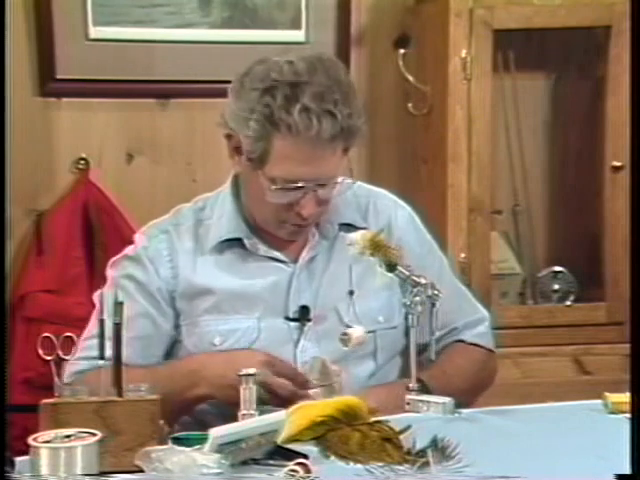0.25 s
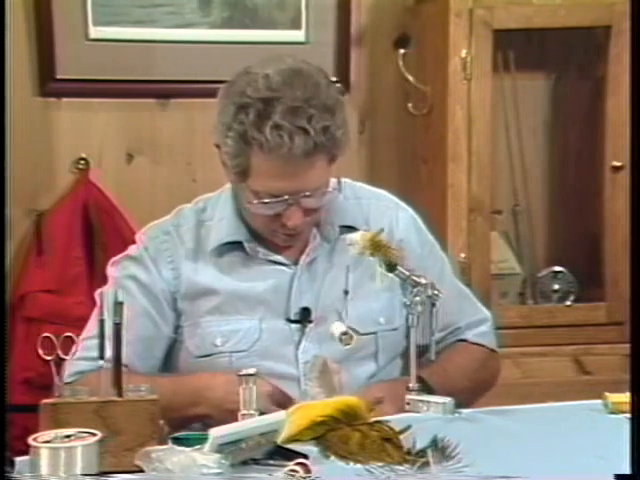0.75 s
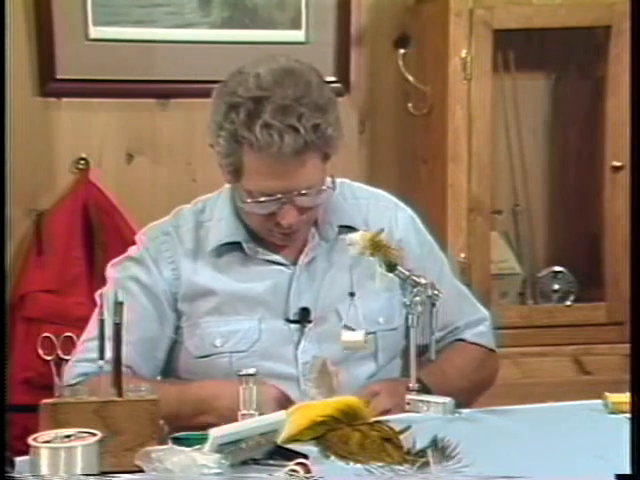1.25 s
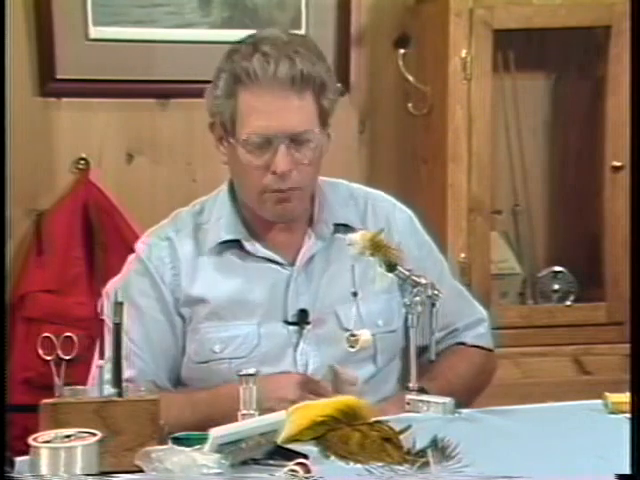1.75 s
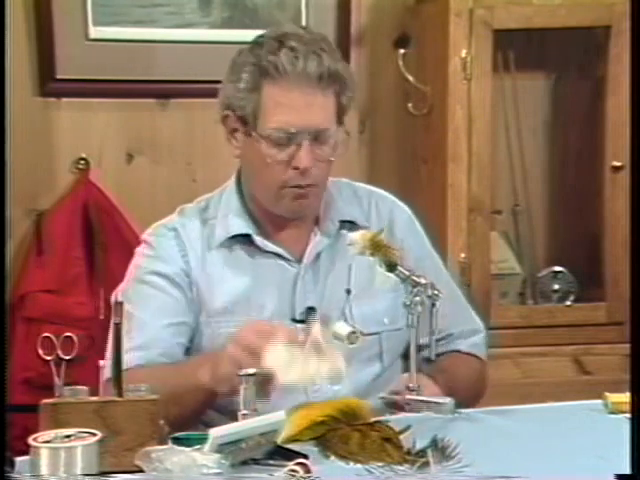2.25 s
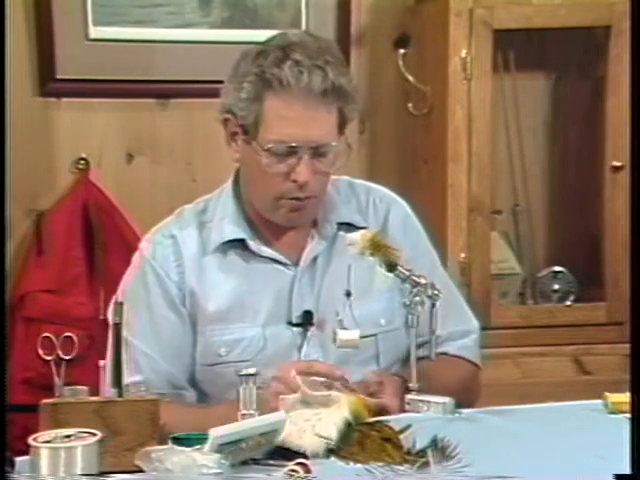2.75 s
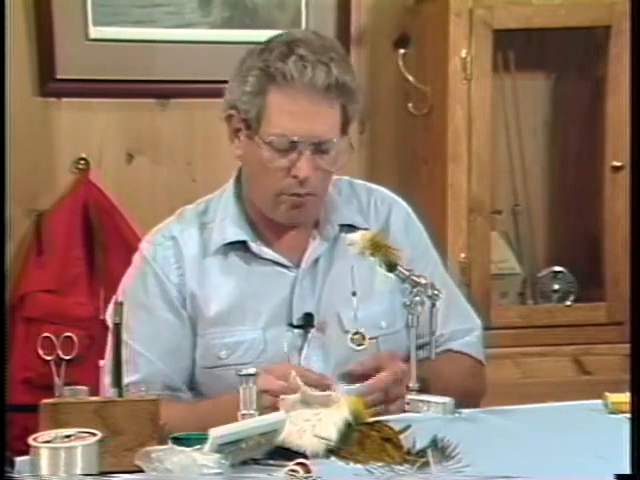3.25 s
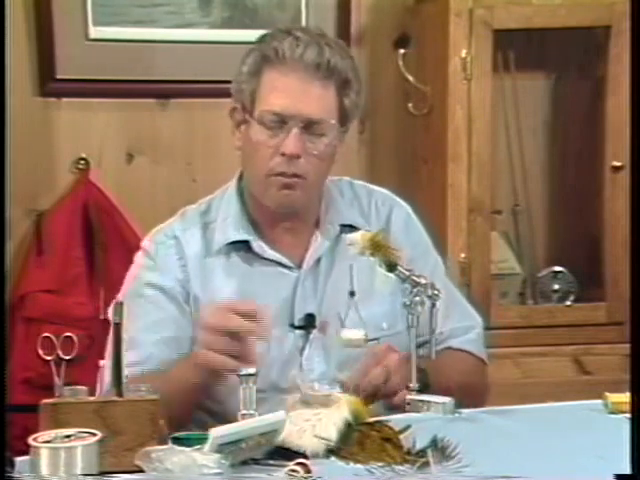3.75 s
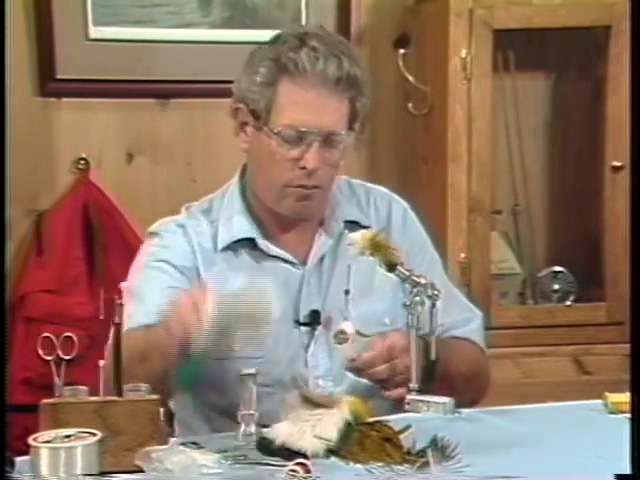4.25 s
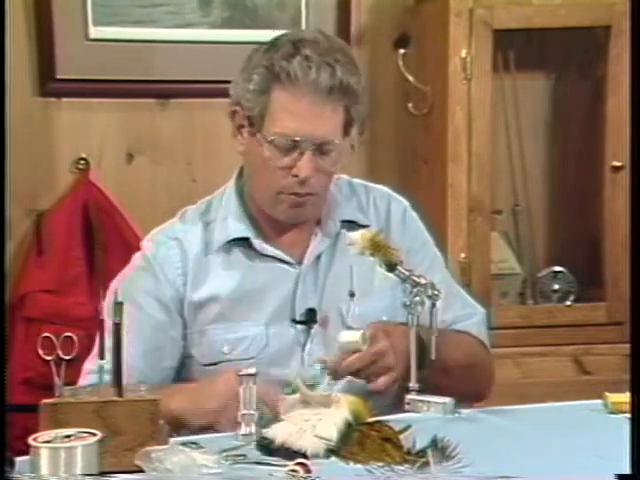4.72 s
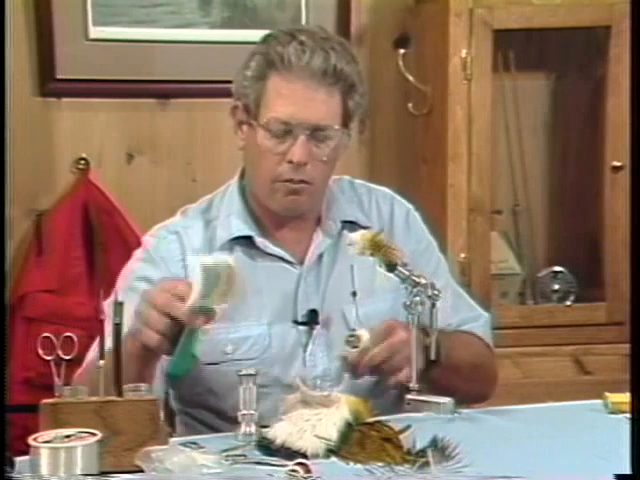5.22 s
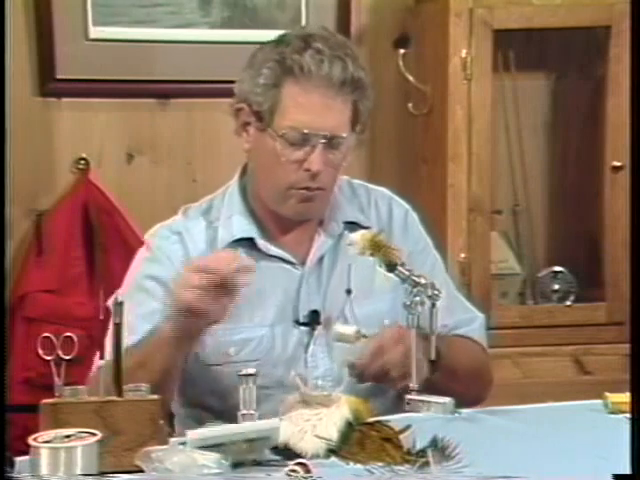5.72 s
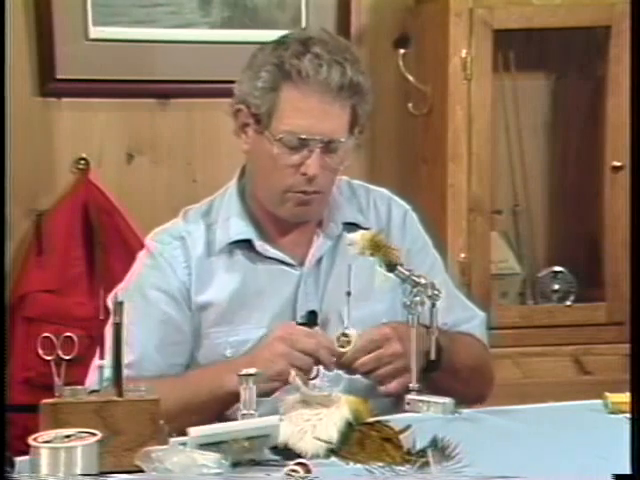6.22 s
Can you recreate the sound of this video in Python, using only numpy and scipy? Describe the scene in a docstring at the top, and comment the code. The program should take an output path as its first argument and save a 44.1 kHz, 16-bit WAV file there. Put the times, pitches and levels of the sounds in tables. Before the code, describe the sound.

At a desk, dry hair rustles and is sheared by small scissors; later stiff bristles rake twice and the brush drops, rattling hollow plastic.

```python
"""Desk in a small panelled room: fly tying, heard from a microphone clipped to the shirt.
Deer hair, as noise-filled snap trains, is gathered from its hide and cut with small scissors; the hide is
laid aside. Two brush strokes, denser snap trains, clear the clump of underfur; the brush, as struck modes,
is dropped back on a plastic box. Thuds and filtered noise give bumps and clothes; hum and hiss lie under all.
"""
import sys
import numpy as np
from scipy import signal
from scipy.io import wavfile
from scipy.ndimage import uniform_filter1d

SR = 44100
rng = np.random.default_rng(int(sys.argv[2]) if len(sys.argv) > 2 else 0)


def wav_record(signal):
    """Record a signal, one row per channel, as 16-bit PCM in the file named by sys.argv[1]."""
    frames = np.transpose(np.atleast_2d(signal))
    bounded = np.clip(frames, -1, 1)
    # unit amplitude maps onto the largest positive 16-bit level
    quanta = np.round(bounded * 32767).astype(np.int16)
    wavfile.write(sys.argv[1], SR, quanta)


N = 285632
TIME_S = np.arange(N) / SR

# spectrum of sliding hair and hissing hair tips: freq_hz, relative_db_per_hz
HAIR_SPECTRUM = [(100, -38), (700, -18.5), (2500, -12.5), (5000, -15), (6500, -6), (8000, 0.5), (9500, 0),
                 (11000, -4), (13500, -15)]
# spectrum of sheared hair and stiff crackles: freq_hz, relative_db_per_hz
CUT_SPECTRUM = [(100, 12), (450, -23), (900, -7), (1700, -8.5), (2400, -12), (3500, -11), (5500, -4),
                (7500, -3.5), (10500, -5.5), (12000, -6), (13500, -24)]
# spectrum of rattling plastic: freq_hz, relative_db_per_hz
BUZZ_SPECTRUM = [(100, -22), (700, -4), (1500, -3.5), (2400, 5), (3300, -5.5), (5000, -12.5), (8000, -26),
                 (13000, -28)]


def amp(db):
    """Decibels to gain."""
    return 10 ** (np.asarray(db) / 20)


def evened(x):
    """Scales to an rms of one."""
    return x / np.sqrt(np.mean(x ** 2) + 1e-20)


def read(points, hz):
    """Interpolates a table on a log-frequency axis."""
    freq_hz, value = np.transpose(points)
    return np.interp(np.log(hz + 1), np.log(freq_hz + 1), value)


def add(mix, start_s, sound):
    """Mixes a sound in at a time, in place."""
    part = mix[max(round(start_s * SR), 0):][:len(sound)]
    part += sound[:len(part)]


def coloured(x, spectrum, size=8192):
    """Minimum-phase filter of unit energy with the given spectrum."""
    freq_hz = abs(np.fft.fftfreq(size, 1 / SR))
    log_gain = np.log(amp(read(spectrum, freq_hz)))
    response = np.exp(np.conj(signal.hilbert(log_gain)))
    taps = np.fft.ifft(response).real[:size // 2]
    return signal.oaconvolve(x, taps / np.linalg.norm(taps))[:len(x)]


def swells(rows):
    """Gain of pushes that build up and die away exponentially; rows: peak_s, level_db, rise_s, fall_s."""
    power = np.zeros(N)
    t = TIME_S[:SR // 2] - 0.1
    for peak_s, level_db, rise_s, fall_s in rows:
        decay = np.minimum(np.maximum(-t / rise_s, t / fall_s), 20)
        add(power, peak_s + t[0], amp(level_db) ** 2 * np.exp(-2 * decay))
    return np.sqrt(power)


def snaps(per_s, spread_db, size=200):
    """Snaps of many hairs over noise: uneven in size, steady in power over `size` samples."""
    sizes = amp(spread_db * np.minimum(rng.exponential(1, N), 4))
    signed = sizes * rng.choice([-1, 1], N)
    train = signed * (rng.random(N) < per_s / SR) + 0.3 * rng.standard_normal(N)
    return train / np.sqrt(uniform_filter1d(train ** 2, size=size))


def ring(modes):
    """Dying modes of a struck body, phases random at every blow; modes: freq_hz, relative_db, t60_s."""
    t = TIME_S[:round(max(t60_s for _, _, t60_s in modes) * SR)]
    phases = rng.random(len(modes))
    body = np.zeros(len(t))
    for (hz, db, t60_s), phase in zip(modes, phases):
        body += amp(db - 60 * t / t60_s) * np.sin(2 * np.pi * (hz * t + phase))
    onset = 1 - np.exp(-2 * t * modes[0][0])  # low bodies take longer to get moving
    return body * onset / np.linalg.norm(amp([db for _, db, _ in modes]))


def floor(hiss_db=-59):
    """Steady amplifier hiss as filtered noise and mains hum as sines."""
    # mains hum: freq_hz, rms_db
    hum_lines = [(59.9, -65), (119.9, -75.5), (179.8, -73.5), (239.8, -70), (299.7, -81), (419.6, -79),
                 (539.5, -80.5), (719.3, -82.5)]
    # amplifier hiss: freq_hz, relative_db_per_hz
    hiss_spectrum = [(15, -32), (25, -9), (64, -3), (190, -10), (241, -13), (313, -16.5), (477, -13),
                     (544, -18.5), (604, -18), (708, -15), (997, -19), (12500, -19.5), (13500, -22)]
    hum = np.zeros(N)
    for hz, rms_db in hum_lines:
        hum += amp(rms_db) * np.sqrt(2) * np.sin(2 * np.pi * (hz * TIME_S + rng.random()))
    return hum + amp(hiss_db) * coloured(rng.standard_normal(N), hiss_spectrum)


def arch(length_s, skew=0.47, roundness=0.71):
    """Speed of one arm movement from rest to rest: quick to build, gentle to slow."""
    u = TIME_S[TIME_S < length_s] / length_s
    return abs(np.sin(np.pi * u ** skew)) ** roundness


def clothes(sleeve_trim_db=-2, shirt_trim_db=-3.0):
    """Each arm movement swishes the sleeve and drags the shirt against the microphone: shaped noise."""
    # movements of arms and body, levels before trim: start_s, length_s, swish_db, rumble_db
    moves = [(0.0, .16, -61.5, -55), (0.19, 0.18, -56, -43), (0.336, 0.27, -56, -43),
             (0.58, .11, -57.5, -44.5), (0.684, 0.26, -61.5, -58), (0.92, 0.31, -58.5, -49),
             (1.128, 0.26, -55.5, -47), (1.3, 0.58, -58, -52), (1.498, 0.044, -79, -46),
             (1.76, 0.51, -56, -60), (2.2, 0.37, -63.5, -54), (4.123, 0.37, -59.5, -73),
             (4.452, 0.17, -53, -57), (4.6, 0.88, -56.5, -55), (5.598, 0.39, -50.5, -59),
             (6.043, 0.24, -70, -71), (6.364, .15, -63, -54)]
    # swish and rumble spectra: freq_hz, relative_db_per_hz
    sleeve_spectrum = [(40, -1), (130, 5), (300, 4), (500, -4.5), (1000, -9.5), (2500, -14.5), (6000, -12),
                       (13000, -19)]
    shirt_spectrum = [(12, -14), (30, -8), (55, 6), (90, -8.5), (150, -6), (300, -18), (800, -53)]
    sleeve, shirt = np.zeros((2, N))
    for start_s, length_s, swish_db, rumble_db in moves:
        add(sleeve, start_s, amp(swish_db) * arch(length_s))
        add(shirt, start_s, amp(rumble_db) * arch(length_s))
    swish = coloured(sleeve * rng.standard_normal(N), sleeve_spectrum)
    rumble = coloured(shirt * rng.standard_normal(N), shirt_spectrum)
    return amp(sleeve_trim_db) * swish + amp(shirt_trim_db) * rumble


def thud(settled_hz, sag, peak_s):
    """A few soft cycles that sink to a settled pitch as the pressure lets go."""
    u = TIME_S[:SR // 4] / peak_s
    envelope = (u * np.exp(1 - u)) ** 1.3
    pitch_hz = settled_hz * (1 + sag * np.exp(-u / 2))
    return envelope * np.sin(2 * np.pi * np.cumsum(pitch_hz) / SR)


def bumps(pat_rise_s=0.0041, pat_fall_s=0.012, thump_lag_s=0.011, thump_peak_s=0.0079, thump_sag=0.17,
          sway_hz=53.4, sway_peak_s=0.015, sway_sag=0.24):
    """Each bump is a dull noise pat, a thump through the body and a slow sway of the microphone."""
    # hands and hide bumping desk and body: pat_peak_s, pat_db, thump_db, thump_settled_hz, sway_db, sway_lag_s
    bump_rows = [(0.171, -42.5, -28, 97, -39, 0.035), (1.17, -39, -42.5, 166, -31.5, .008),
                 (1.299, -32.5, -28, 128, -27.5, .026), (1.784, -47, -35, 131.5, -34, 0.0187),
                 (2.191, -52, -36.5, 85.4, -45, 0.0099), (4.46, -54.5, -59, 134, -47.5, .024),
                 (4.685, -60, -60, 120, -43, 0.0083)]
    # pat spectrum: freq_hz, relative_db_per_hz
    pat_spectrum = [(60, -11), (200, -0.5), (320, -2.5), (480, -9.5), (800, -24.5), (3000, -42)]
    pats = swells([(s, pat_db, pat_rise_s, pat_fall_s) for s, pat_db, *_ in bump_rows])
    out = coloured(pats * rng.standard_normal(N), pat_spectrum)
    for s, _, thump_db, thump_hz, sway_db, sway_lag_s in bump_rows:
        add(out, s + thump_lag_s, amp(thump_db) * thud(thump_hz, thump_sag, thump_peak_s))
        add(out, s + sway_lag_s, amp(sway_db) * thud(sway_hz, sway_sag, sway_peak_s))
    return out


def held(length_s, attack_s=0.0091, release_s=0.029):
    """Pressure of one rub: attack, hold, release."""
    t = TIME_S[:SR // 2]
    return np.minimum(t / attack_s, 1) * np.exp(-np.maximum(t - length_s, 0) / release_s)


def hair(catch_db=2.0, crackle_db=-3, crackles_per_s=130):
    """Hollow hairs slide and flick under the fingers, catching in bunches; a few stiff ones crackle."""
    # fingers rubbing through the hair: start_s, length_s, level_db
    rubs = [(0.179, 0.066, -62), (0.3, 0.19, -56.5), (0.55, 0.076, -59), (0.896, 0.13, -61.5),
            (1.092, 0.19, -60.5), (1.371, 0.062, -55), (1.512, 0.1, -65), (1.753, 0.085, -54.5),
            (1.863, 0.11, -60.5), (2.214, 0.086, -67), (6.358, 0.026, -57)]
    # tufts of hair or bristle springing free: peak_s, level_db, rise_s, fall_s
    tufts = [(0.327, -42.5, 0.0012, .003), (0.347, -43, 0.0049, .004), (0.36, -43, .003, .002),
             (1.156, -43.5, .004, 0.0057), (1.754, -41.5, 0.0068, 0.026), (5.667, -43.5, 0.0095, 0.0081),
             (5.724, -47.5, 0.0034, 0.036)]
    pressure = np.zeros(N)
    for start_s, length_s, level_db in rubs:
        add(pressure, start_s, amp(level_db) * held(length_s))
    slow_noise = evened(uniform_filter1d(rng.standard_normal(N), size=200))
    bunched = pressure * evened(amp(catch_db * slow_noise))
    push = np.hypot(bunched, swells(tufts))
    slide = coloured(push * snaps(per_s=3000, spread_db=-0.5, size=400), HAIR_SPECTRUM)
    stiff = evened((2 * rng.random(N) - 1) * (rng.random(N) < crackles_per_s / SR))
    return slide + amp(crackle_db) * coloured(bunched * stiff, CUT_SPECTRUM)


def ticks(fall_s=0.001, ring_s=0.00082):
    """Steel blades and single stiff hairs tick: a short noise crack with a few cycles of ring."""
    # light ticks, crack level before halving: start_s, crack_db, ring_db, ring_hz
    tick_rows = [(0.77, -52, -45, 9100), (1.1737, -34.5, -30, 9700), (1.1885, -31, -49, 4500),
                 (1.2, -29.5, -35, 8200), (1.2472, -24, -45, 7750), (1.2872, -24.5, -35, 7750),
                 (1.3505, -53, -27.5, 6200), (1.795, -33, -43, 3400), (5.334, -43, -48, 6650)]
    # crack spectrum: freq_hz, relative_db_per_hz
    tick_spectrum = [(100, -9), (1500, -10.5), (3500, -14), (6000, 0), (10000, -2), (13500, -11)]
    out, t = np.zeros(N), TIME_S[:800]
    for start_s, crack_db, ring_db, hz in tick_rows:
        burst = rng.choice([-1, 1], len(t)) * np.exp(-t / fall_s)
        crack = coloured(burst, tick_spectrum) / 2
        tone = np.sin(2 * np.pi * hz * t) * np.exp(-t / ring_s)
        add(out, start_s, amp(crack_db) * crack + amp(ring_db) * tone)
    return out


def scissors(closing_db=-27, closing_s=1.3071, closing_rise_s=0.002, closing_fall_s=0.0011):
    """The blades bite, then shear the clump in a dense burst of snaps; bright noise as the tips close."""
    # blades biting, then shearing: peak_s, level_db, rise_s, fall_s
    cuts = [(1.2975, -29, 0.0021, 0.0057), (1.3073, -15.5, 0.0012, 0.0015), (1.313, -44.5, .003, 0.033)]
    # closing blade tips: freq_hz, relative_db_per_hz
    edge_spectrum = [(100, -31), (4000, -19), (8000, -5), (10800, 2), (13500, -23)]
    parting = snaps(per_s=14000, spread_db=1, size=60)
    closing = swells([(closing_s, closing_db, closing_rise_s, closing_fall_s)])
    tips = coloured(closing * rng.standard_normal(N), edge_spectrum)
    return coloured(swells(cuts) * parting, CUT_SPECTRUM) + tips


def brushing(bite_lead_s=0.0099, bite_db=-7, bite_rise_s=0.0018, pull_fall_s=0.006,
             drag_lag_s=0.021, drag_db=-17.5, drag_s=0.009, tips_fall_s=0.012, echo_s=0.0017, echo_db=-9):
    """Stiff bristles bite, pull and drag out while hair tips hiss; the desk top throws each snap back."""
    # bristles scraping the desk as the brush is lifted, then raking: peak_s, level_db, rise_s, tips_db
    strokes = [(4.17, -60, 0.0036, -75), (4.7, -16.5, .0009, -52), (4.9894, -23, 0.0072, -31.5)]
    # raking bristles: freq_hz, relative_db_per_hz
    stroke_spectrum = [(100, -7), (500, -8.5), (850, -14), (1400, -7.5), (2400, -10.5), (3800, -8.5),
                       (4900, -1), (6500, 1), (8500, 0), (10800, -5.5), (13500, -12.5)]
    pulls = []
    for s, level_db, rise_s, _ in strokes:
        pulls.append((s - bite_lead_s, level_db + bite_db, bite_rise_s, pull_fall_s))  # tips enter first
        pulls.append((s, level_db, rise_s, pull_fall_s))
        pulls.append((s + drag_lag_s, level_db + drag_db, drag_s, drag_s))  # last hairs drag out
    rake = coloured(swells(pulls) * snaps(per_s=13000, spread_db=3, size=110), stroke_spectrum)
    tips = swells([(s, tips_db, rise_s, tips_fall_s) for s, _, rise_s, tips_db in strokes])
    rake = rake + coloured(tips * rng.standard_normal(N), HAIR_SPECTRUM)
    return rake + amp(echo_db) * np.interp(TIME_S - echo_s, TIME_S, rake)


def rebounds(rattle_s, first_gap_s=0.0032, gap_growth=1.55, count=6):
    """Delays and gains of the contacts in one knock: ever wider apart and weaker."""
    delays_s = first_gap_s * (gap_growth ** np.arange(count) - 1) / (gap_growth - 1)
    return [(delay_s, np.exp(-delay_s / rattle_s)) for delay_s in delays_s if delay_s < 3 * rattle_s]


def knocks(click_s=0.001, chatter_s=0.005, chatter_db=-10, head_db=-0.5, buzz_db=-12, buzz_s=0.013):
    """The brush is picked up, rings as each stroke catches and lets go, then clatters down: clicks and modes."""
    # knocks, click before halving, head before head_db: start_s, click_db, head_db, desk_db, rattle_s
    knock_rows = [(4.161, -39.5, -54, -54, 0.0051), (4.167, -39, -39, -55, 0.0039),
                  (4.703, -29, -39, -62, 0.0011), (4.7295, -19, -45, -62, 0.0015),
                  (4.991, -27, -32, -46, 0.00092), (5.0238, -24.5, -32.5, -55, 0.0016),
                  (5.5806, -17.5, -32, -27, 0.019), (5.667, -37, -48, -32, 0.0034),
                  (5.678, -31.5, -54, -45, 0.0014), (5.733, -36, -50.5, -39.5, .01)]
    # modes of the brush head and of the desk: freq_hz, relative_db, t60_s
    brush_modes = [(1520, -8, 0.032), (1710, 8, 0.025), (2125, 12.5, 0.02), (2130, -48, .05),
                   (2550, -2.5, 0.13), (3050, -8.5, 0.061), (3520, 0, 0.049), (4280, -23, 0.057),
                   (5200, -4, 0.074)]
    desk_modes = [(145.7, -7, 0.3), (155.7, -11, 0.61), (177, -8, 0.28), (253, -9.5, 0.14),
                  (322.5, -5, 0.23), (440, -6.5, 0.095), (486, 0, 0.044), (574, -2.5, 0.055),
                  (636, -8, 0.086)]
    # sharp clicks: freq_hz, relative_db_per_hz
    click_spectrum = [(100, -7), (800, -17), (2000, -5), (4000, -9.5), (6000, -6), (8200, -5),
                      (10000, -13.5), (13500, -26)]
    t = TIME_S[:5000]
    contact = np.exp(-t / click_s) + amp(chatter_db) * np.exp(-t / chatter_s)  # bristles chatter after the blow
    out, clicks, buzz = np.zeros((3, N))
    for s, click_db, brush_db, desk_db, rattle_s in knock_rows:
        for delay_s, gain in rebounds(rattle_s):
            click = contact * rng.choice([-1, 1], len(t)) / 2
            rattle = np.exp(-t / buzz_s) * rng.standard_normal(len(t))
            add(clicks, s + delay_s, gain * amp(click_db) * click)
            add(buzz, s + delay_s, gain * amp(brush_db + buzz_db) * rattle)
            add(out, s + delay_s, gain * amp(brush_db + head_db) * ring(brush_modes))
        add(out, s, amp(desk_db) * ring(desk_modes))  # the heavy desk takes the whole rattle as one blow
    return out + coloured(clicks, click_spectrum) + coloured(buzz, BUZZ_SPECTRUM)


def box(landing_s=5.5815, landing_db=-21, build_s=0.0017,
        clatter_db=-35, clatter_rise_s=0.0033, clatter_s=0.033):
    """The hollow plastic box sounds modes that build up as the brush rattles onto it; the brush clatters on it
    as it settles."""
    # modes of the box: freq_hz, relative_db, t60_s
    box_modes = [(808, -6, 0.057), (950, -8, 0.053), (1300, -11, 0.077), (1344, 0.5, 0.21),
                 (1445, -6.5, 0.19), (1450, -8, 0.077), (1535, -1, 0.088), (1670, -11, 0.052),
                 (2050, -10, 0.11), (2400, -17, 0.15), (2520, -6.5, 0.14), (2910, -12.5, 0.16),
                 (3190, -9, 0.094), (3220, -15, 0.13), (3930, -8, 0.032)]
    out, note = np.zeros(N), ring(box_modes)
    build = 1 - np.exp(-TIME_S[:len(note)] / build_s)
    add(out, landing_s, amp(landing_db) * note * build)
    t = np.maximum(TIME_S - landing_s, 0)
    shaking = (1 - np.exp(-t / clatter_rise_s)) * np.exp(-t / clatter_s)
    clatter = coloured(shaking * snaps(per_s=1300, spread_db=-3.0), BUZZ_SPECTRUM)
    return out + amp(clatter_db) * clatter


def room(x, gap_s=0.004, reflections_per_s=3000):
    """Sparse reflections of random sign, each band dying at its own speed."""
    # decay of the room: freq_hz, t60_s
    room_decay = [(150, 0.9), (600, 0.41), (2500, 0.21), (7000, 0.19), (13000, 0.13)]
    present = (rng.random(SR) < reflections_per_s / SR) * (TIME_S[:SR] > gap_s)
    taps = rng.choice([-1., 1.], SR) * present
    hz, t, bands = signal.stft(taps, SR, nperseg=256)
    decay = amp(-60 * t / read(room_decay, hz)[:, None])
    tail = signal.istft(bands * decay, SR, nperseg=256)[1]
    return signal.fftconvolve(x, tail / np.linalg.norm(tail))[:N]


def scene(near_room_db=-26, stroke_room_db=-18, desk_room_db=-10, side_noise_db=-74):
    """Hand work is close and dry; desk knocks stir the room; a faint, mostly high noise differs left and right."""
    # faint noise that differs left and right: freq_hz, relative_db_per_hz
    side_spectrum = [(50, -30), (700, -16), (1500, -33), (5000, -3.5), (9000, 8), (12500, 5), (13800, 13)]
    near = bumps() + hair() + ticks() + scissors()
    strokes, desk = brushing(), knocks()
    echoes = room(amp(near_room_db) * near + amp(stroke_room_db) * strokes + amp(desk_room_db) * desk)
    mono = floor() + clothes() + near + strokes + desk + box() + echoes
    side_noise = np.array([coloured(noise, side_spectrum) for noise in rng.standard_normal((2, N))])
    return mono + amp(side_noise_db) * side_noise


def record(dry, edge_hz=13800):
    """Linear-phase low-pass that limits the band."""
    taps = signal.firwin(301, edge_hz, window=("kaiser", 8), fs=SR)
    return signal.oaconvolve(dry, taps[None], "same")


dry = scene()
out = record(dry)
wav_record(out)
```